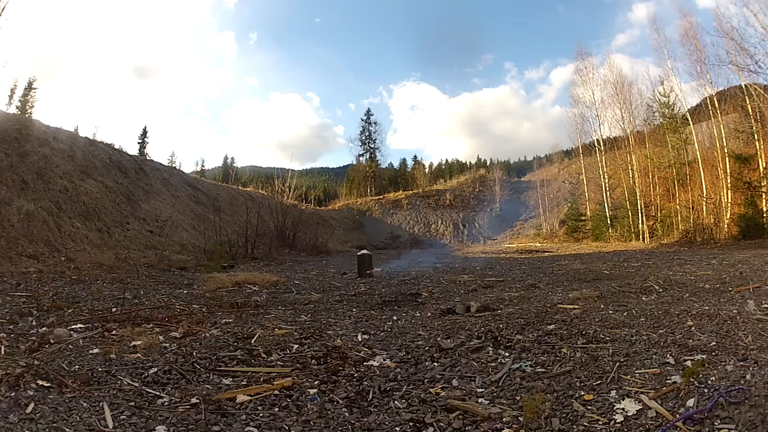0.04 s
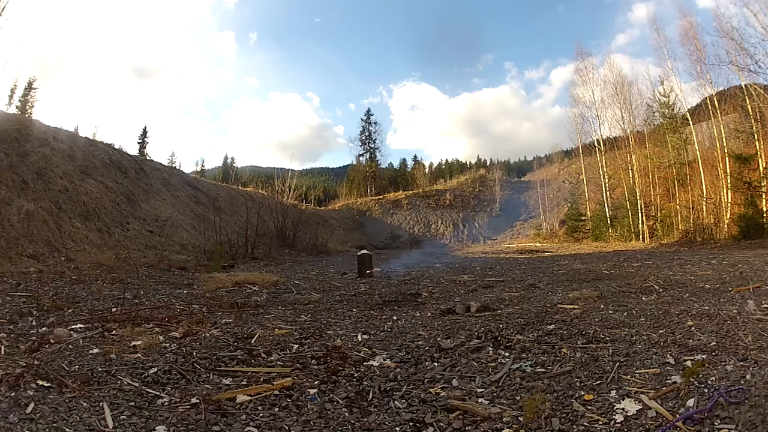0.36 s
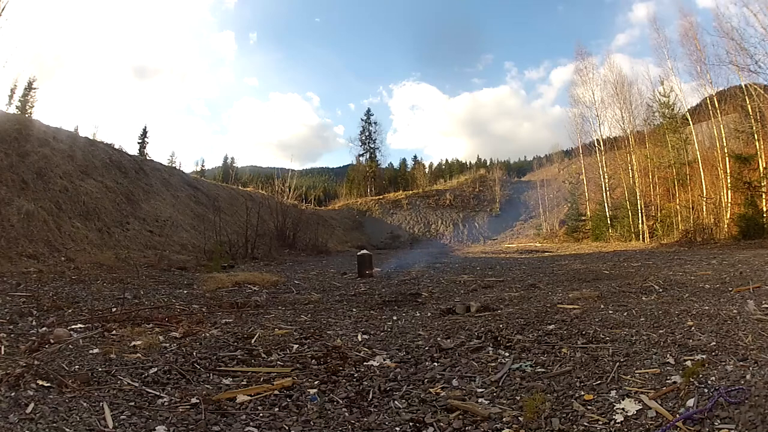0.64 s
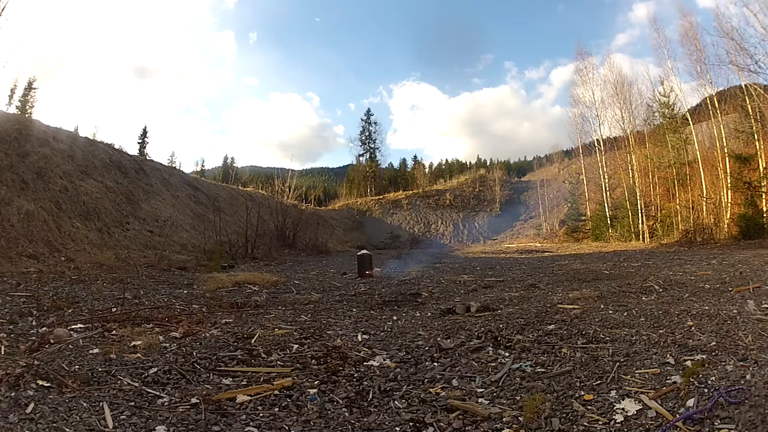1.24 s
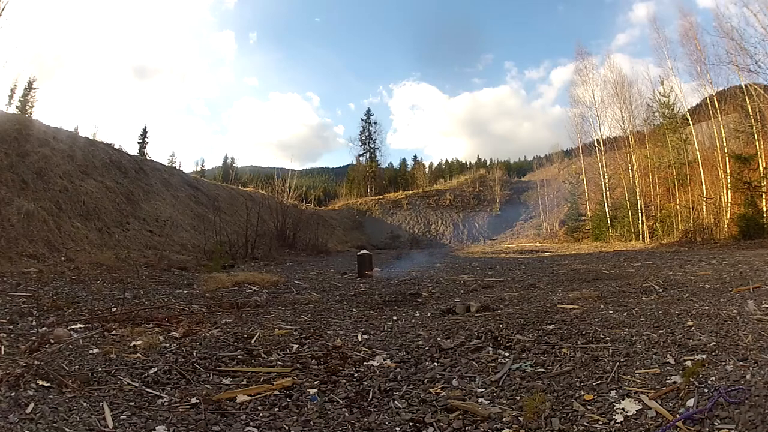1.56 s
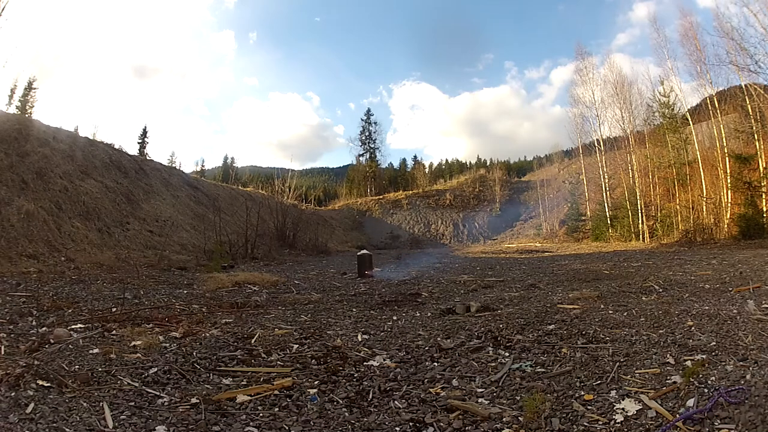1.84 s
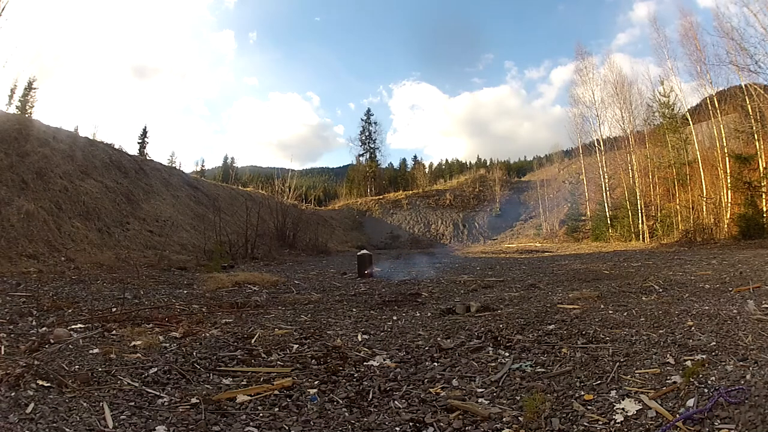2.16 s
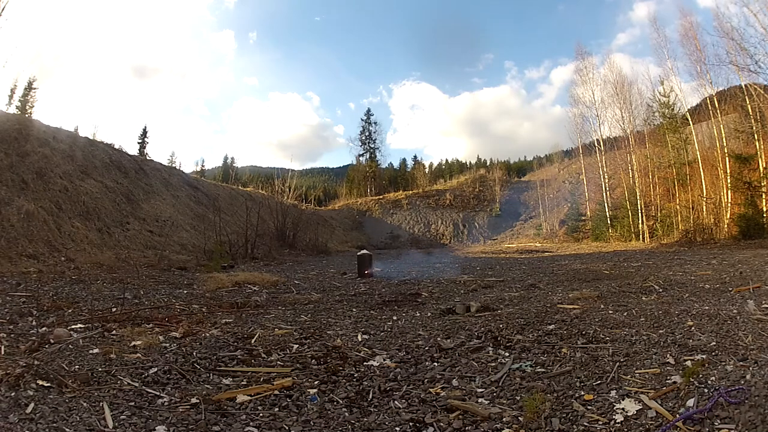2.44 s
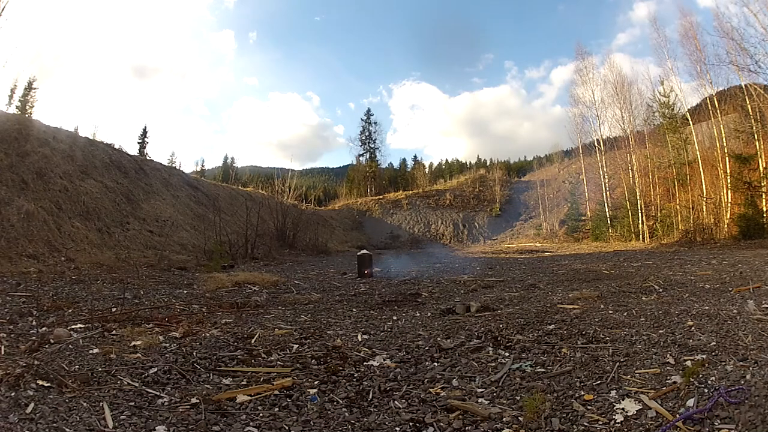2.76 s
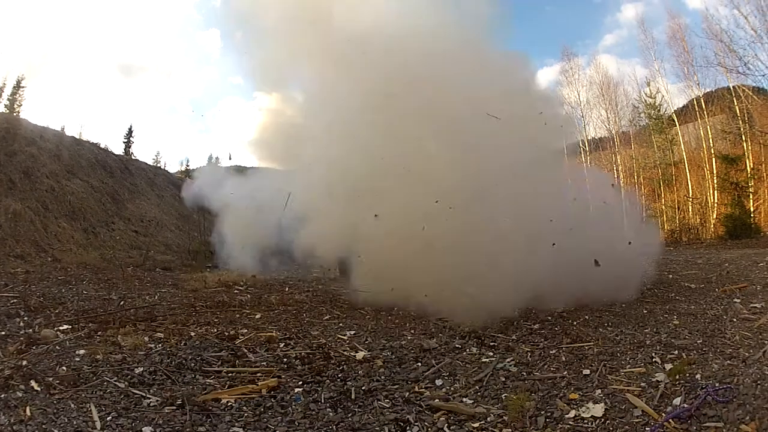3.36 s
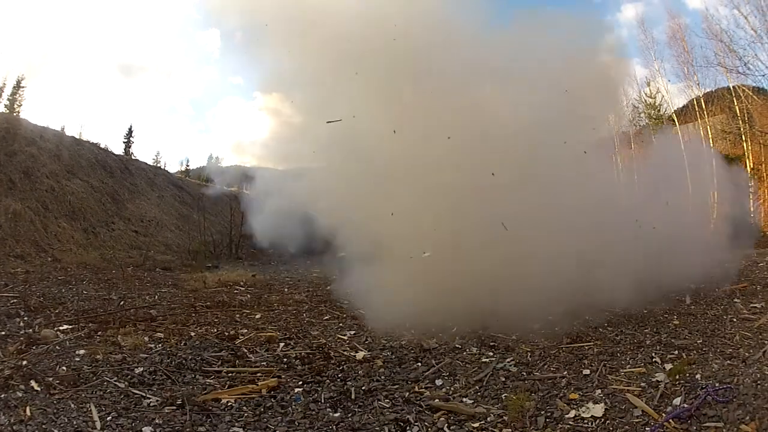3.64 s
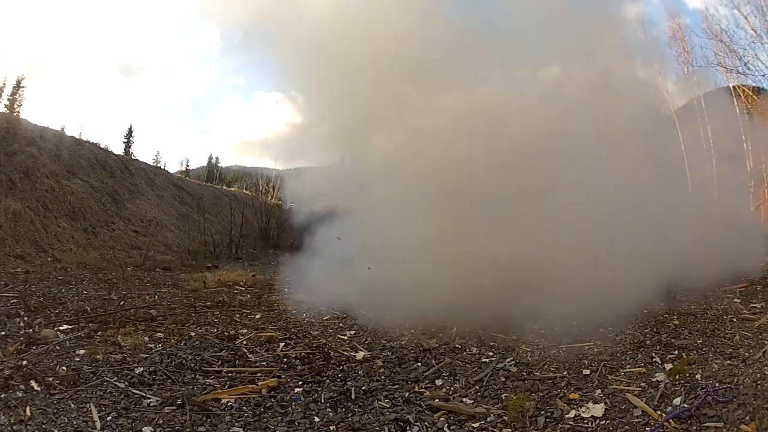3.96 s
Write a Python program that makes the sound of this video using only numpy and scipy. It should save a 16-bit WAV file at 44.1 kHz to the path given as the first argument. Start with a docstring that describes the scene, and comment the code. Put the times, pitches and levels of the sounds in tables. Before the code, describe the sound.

A very loud explosion goes off in a gravel pit. For the first 3 seconds, only a faint sputtering fuse, soft wind and a distant engine drone are heard. At 3 seconds a deep boom and sharp crack overload the microphone, followed by quick slaps off nearby banks. A rumbling echo swells around 3.5 seconds and fades, with faint, brief whistles of flying fragments near 4 seconds.

```python
"""A can of black powder explodes in a gravel pit, radiating a shock front, a boom and a crack.
Before it, the fuse hisses over soft wind and the drone of a distant engine. The near banks reflect
the blast as slaps; the forested hill returns it half a second later as a rolling rumble, and two
fragments whistle through the air. The blast overloads the small camera that picks it up."""
import sys
import numpy as np
from scipy import signal
from scipy.fft import rfft, irfft
from scipy.io import wavfile
from scipy.ndimage import uniform_filter1d

SR = 44100
rng = np.random.default_rng(int(sys.argv[2]) if len(sys.argv) > 2 else 0)


def pcm_store(signal):
    """Save signal as 16-bit PCM."""
    levels = np.round(np.clip(np.atleast_2d(signal), -1, 1) * 32767)
    wavfile.write(sys.argv[1], SR, levels.astype(np.int16).T)


N = 176400
START_S, BLAST_S = 0.144, 3.0125  # the sound begins; the shock arrives
HOLD_HZ = 12000  # the camera's sampling rate


def undb(db):
    """Amplitude ratio of a level in decibels."""
    return 10 ** (np.asarray(db) / 20)


def clock():
    """Time of each sample in seconds."""
    return np.arange(N) / SR


def noise(spectrum):
    """Spectral shaping: band-limited noise of unit rms from (f/Hz, relative level/dB) points."""
    hz, db = np.array(spectrum, float).T
    f = np.maximum(np.fft.rfftfreq(N, 1 / SR), 1)
    gain = undb(np.interp(np.log(f), np.log(hz), db)) * (f > 10) * (f < HOLD_HZ / 2)
    x = irfft(rfft(rng.standard_normal(N)) * gain, N)
    return x / x.std()


def walk(rate_hz):
    """Random modulation: smoothed steps with a spread near 1."""
    k = max(int(SR / rate_hz), 1)
    steps = np.repeat(rng.standard_normal(N // k + 1), k)
    return 1.3 * uniform_filter1d(uniform_filter1d(steps, k), k)[:N]


def dense(spectrum, span_s):
    """Diffuse field: many overlapping wavefronts give noise whose power is even over span_s."""
    x = noise(spectrum)
    return x / np.sqrt(uniform_filter1d(x ** 2, max(int(span_s * SR), 2)) + 1e-6)


def burst(at, attack, hold, fall):
    """Exponential decay after a linear attack and a hold; times in seconds."""
    age = clock() - at
    return np.clip(age / attack, 0, 1) * np.exp(-np.maximum(age - attack - hold, 0) / fall)


def bell(at, width):
    """Gaussian envelope; centre and standard deviation in seconds."""
    return np.exp(-.5 * ((clock() - at) / width) ** 2)


def engine():
    """Harmonic series: a far engine drones on a wavering fundamental as its overtones fade."""
    # course of the fundamental: t/s, f/Hz, level/dB
    course = [(0.16, 53.3, -50), (0.45, 59.9, -51), (0.58, 59.5, -57), (0.73, 48.9, -58), (0.98, 57.6, -52),
              (1.3, 56.0, -55), (1.64, 71.8, -53), (1.96, 73.0, -51), (2.15, 65.5, -53), (2.55, 63.5, -52),
              (2.95, 65, -49)]
    # partials: harmonic number, relative level/dB at the start, relative level/dB at the blast
    harmonics = [(1, 0, 0), (2, -1, -12), (3, -5, -13), (4, -2, -19)]
    t = clock()
    times, hz, db = np.array(course).T
    pitch = np.interp(t, times, hz) * (1 + .012 * walk(14))
    phase = 2 * np.pi * np.cumsum(pitch) / SR
    tones = 0
    for k, first, last in harmonics:
        level_db = np.interp(t, [START_S, BLAST_S], [first, last]) + 2 * walk(9)
        tones += undb(level_db) * np.sin(k * phase)
    return np.sqrt(2) * tones * undb(np.interp(t, times, db))


def wind():
    """Pressure fluctuation: soft outdoor air, with a few puffs of wind on the microphone."""
    # spectra of the air and the puffs: f/Hz, relative level/dB
    air_spectrum = [(20, -14), (45, -2), (90, -8), (160, -2), (250, -3), (520, -9), (700, -14), (1100, -16),
                    (5500, -30)]
    puff_spectrum = [(20, -6), (45, 0), (130, -3), (250, -22), (1000, -50)]
    # puffs: t/s, width/s, level/dB
    gusts = [(.17, .03, -47), (.36, .025, -48), (1.44, .02, -45), (1.6, .03, -50), (1.87, .04, -49),
             (2.01, .035, -43)]
    easing_db_per_s = 1.0
    air = noise(air_spectrum) * undb(-49.3 - easing_db_per_s * clock() + 1.2 * walk(5))
    puffs = sum(undb(db) * bell(at, width) for at, width, db in gusts)
    return air + puffs * noise(puff_spectrum)


def fuse():
    """Combustion noise: a sputtering hiss, brighter while the fuse burns outside the can."""
    # course of the hiss: t/s, level/dB
    course = [(0.15, -56), (1.1, -56), (1.32, -57), (1.5, -54.5), (1.75, -54.5), (2.03, -51.5),
              (2.15, -53.2), (2.45, -52.5), (2.75, -48), (2.97, -51.5)]
    # spectra of the hiss and the early sizzle: f/Hz, relative level/dB
    hiss_spectrum = [(300, -9), (520, -3), (850, -6), (1350, -5), (2500, 0), (3600, -1.5), (4500, -1.5),
                     (5800, -5)]
    sizzle_spectrum = [(2500, -20), (3600, -7), (4400, 0), (5800, -2)]
    t = clock()
    hiss = noise(hiss_spectrum) * undb(np.interp(t, *np.array(course).T))
    sizzle = noise(sizzle_spectrum) * undb(-58) * burst(START_S, attack=.001, hold=.5, fall=.6)
    sputter = undb(1.3 * walk(30))
    return (hiss + sizzle) * sputter * (t < BLAST_S)


def blast():
    """Sudden expansion: the shock front, the boom of the gas ball and the crack of the bursting can."""
    # spectra of the gas ball and the can: f/Hz, relative level/dB
    boom_spectrum = [(20, -20), (70, -12), (130, -4), (230, 0), (300, -7), (375, 2), (520, -9), (750, -21),
                     (1500, -28), (5500, -50)]
    crack_spectrum = [(200, -6), (450, 0), (750, -3), (1300, 0), (1800, -3), (2600, -1), (4200, -5),
                      (5800, -6)]
    time_constant_s = .0012
    age = np.maximum(clock() - BLAST_S, 0) / time_constant_s
    shock = -undb(3) * np.e * age * (1 - age / 2) * np.exp(-age)
    boom = undb(-2.5) * dense(boom_spectrum, .012) * burst(BLAST_S, attack=.0015, hold=.012, fall=.004)
    crack = undb(-9) * noise(crack_spectrum) * burst(BLAST_S + .001, attack=.002, hold=.011, fall=.016)
    return shock + boom + crack


def banks():
    """Early reflection: rounded N-waves with gritty tails, over scattering from the pit floor."""
    # reflections from the banks: t/s, centre-to-peak time/s, peak level/dB, grit level/dB
    reflections = [(3.0545, .001, -5, -26), (3.0625, .001, -6, -29), (3.0725, .0014, -3, -40),
                   (3.091, .0015, -6, -26), (3.1107, .0012, -3, -26), (3.153, .001, -18, -28),
                   (3.165, .001, -8, -31), (3.1825, .0013, 1, -38), (3.228, .0015, -5, -48),
                   (3.327, .003, -10, -54), (3.346, .002, -9, -52), (3.434, .004, -10, -46)]
    # spectra of the floor scatter and the grit: f/Hz, relative level/dB
    floor_spectrum = [(20, -26), (45, -12), (80, -2), (170, 0), (240, 0), (310, -6), (400, -8), (520, -17),
                      (690, -26), (1500, -35), (5500, -50)]
    grit_spectrum = [(250, -6), (600, 0), (1200, -2), (2500, -7), (4200, -10), (5800, -15)]
    t, slaps, tails = clock(), 0, 0
    for at, width, db, grit_db in reflections:
        slaps -= undb(db) * np.sqrt(np.e) * (t - at) / width * bell(at, width)
        tails += undb(grit_db) * burst(at - 2 * width, attack=.002, hold=.002, fall=.012)
    debris = undb(-33) * burst(BLAST_S, attack=.02, hold=.02, fall=.33)  # scatter off stones and twigs
    floor = undb(-11.5) * dense(floor_spectrum, .04) * burst(BLAST_S, attack=.015, hold=.06, fall=.175)
    grit = (tails + debris) * noise(grit_spectrum) * undb(1.5 * walk(250))
    return slaps + floor + grit


def hill():
    """Diffuse echo: the slope returns the bass, then the trees a brighter roar; a far rumble lingers."""
    # echo in each register: crest t/s, rise/s, fall/s, level/dB
    low = (3.47, .03, .24, -12.5)
    mid = (3.6, .075, .115, -16)
    high = (3.595, .1, .13, -24.5)
    # spectra of the three registers and the far rumble: f/Hz, relative level/dB
    low_spectrum = [(15, -24), (28, -8), (50, 0), (115, 0), (170, -9), (300, -25), (1000, -55)]
    mid_spectrum = [(60, -12), (130, -1), (230, 0), (330, -5), (450, -4), (580, -15), (1000, -30),
                    (3000, -55)]
    high_spectrum = [(300, -12), (600, -1), (800, 0), (1000, -4), (2000, -8), (3200, -16), (4600, -23),
                     (5800, -35)]
    rumble_spectrum = [(40, -8), (70, -1), (130, 0), (280, -1), (450, -10), (700, -21), (1500, -23),
                       (2500, -30), (5000, -48)]
    t = clock()
    crest_s = .025  # rounds the top of each swell
    out = undb(-28) * dense(rumble_spectrum, .06) * burst(BLAST_S, attack=.6, hold=.1, fall=1.3)
    registers = (low, low_spectrum), (mid, mid_spectrum), (high, high_spectrum)
    for (at, rise, fall, db), spectrum in registers:
        from_crest = np.hypot(t - at, crest_s) - crest_s
        swell = np.exp(-from_crest / np.where(t < at, rise, fall)) * (t > BLAST_S)
        out += undb(db) * swell * dense(spectrum, .06)
    return out


def fragments():
    """Aerodynamic tones: flying fragments give short, slightly rough, rising whistles."""
    # whistles at their loudest: t/s, width/s, f/Hz, rise/(octaves per s), level/dB
    whistles = [(3.932, .016, 2760, 4.6, -44), (3.988, .03, 1650, 5.2, -43), (3.995, .013, 4980, 2.8, -57)]
    out, roughness = 0, .012
    for at, width, hz, rise, db in whistles:
        octaves = rise * np.clip(clock() - at, -.2, .1)
        pitch = hz * 2 ** octaves * (1 + roughness * walk(700))
        envelope = undb(db + 1.5 * walk(200)) * bell(at, width)
        out += envelope * np.sqrt(2) * np.sin(2 * np.pi * np.cumsum(pitch) / SR)
    return out


def scene():
    """Superposition: the sources and their echoes add in one channel."""
    return (engine() + wind() + fuse() + blast() + banks() + hill() + fragments())[None]


def record(dry):
    """Clipping and imaging: the camera overloads; its held samples mirror the sound into the treble."""
    band_hz, top_hz = 5650, 15300  # low-pass edges before and after sampling
    clipped = np.clip(dry, -1.1, 1.1) * (clock() > START_S)
    narrow = signal.sosfiltfilt(signal.butter(10, band_hz, fs=SR, output="sos"), clipped)
    coarse = signal.resample_poly(narrow, HOLD_HZ, SR, axis=1, window=("kaiser", 2))
    held = np.repeat(coarse, 4, axis=1)
    imaged = np.clip(signal.resample_poly(held, SR, 4 * HOLD_HZ, axis=1)[:, :N], -1, 1)
    return signal.sosfiltfilt(signal.ellip(8, .1, 60, top_hz, fs=SR, output="sos"), imaged)


dry = scene()
out = record(dry)
pcm_store(out)
```